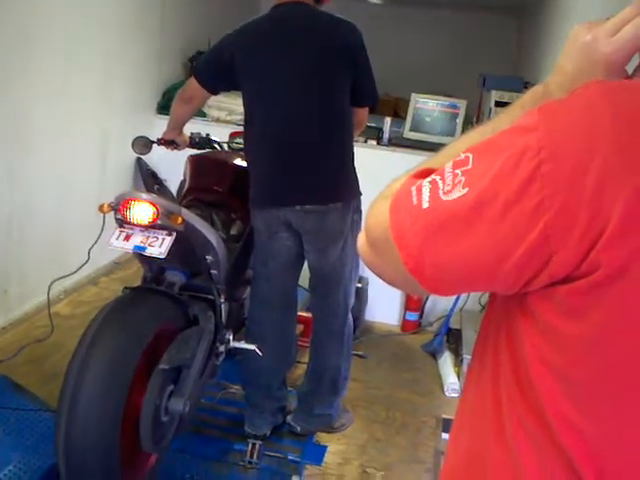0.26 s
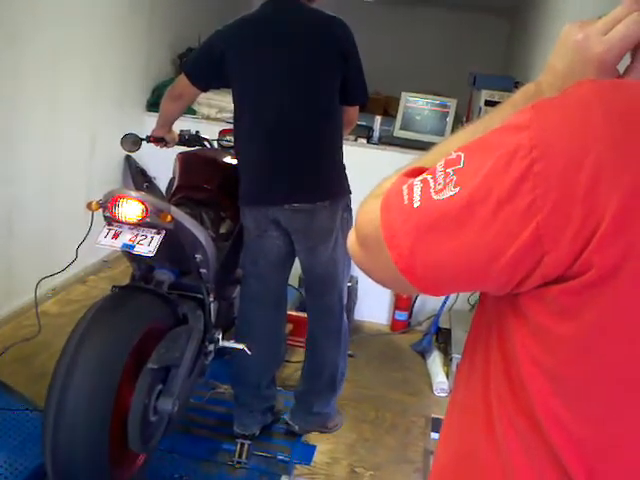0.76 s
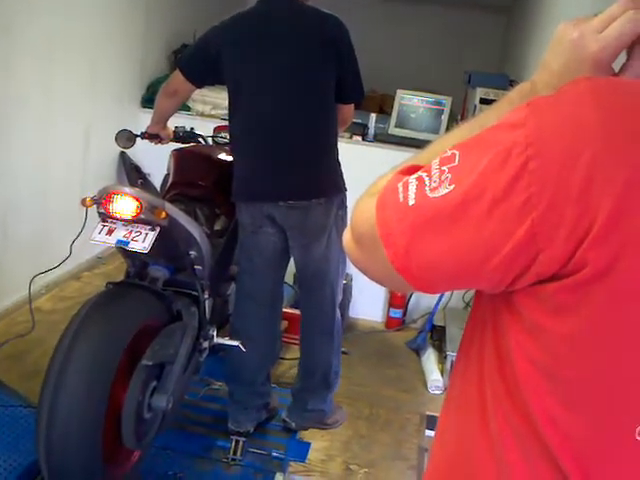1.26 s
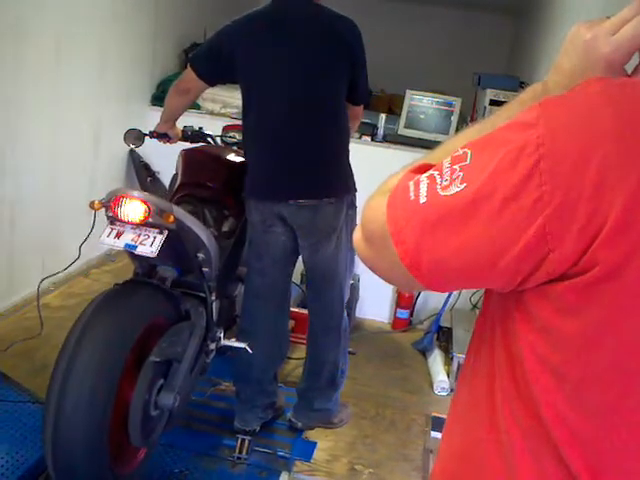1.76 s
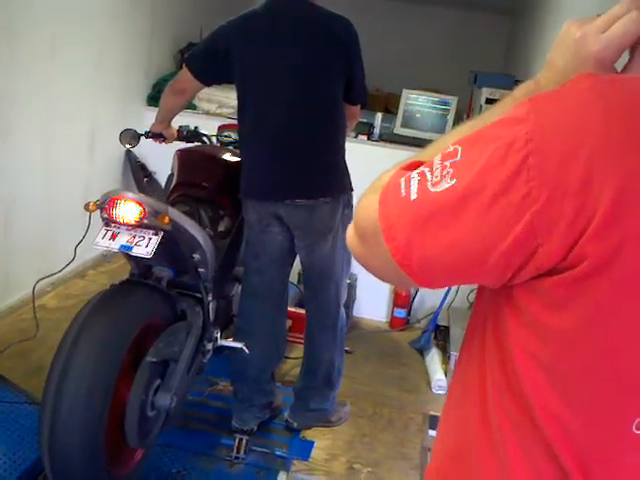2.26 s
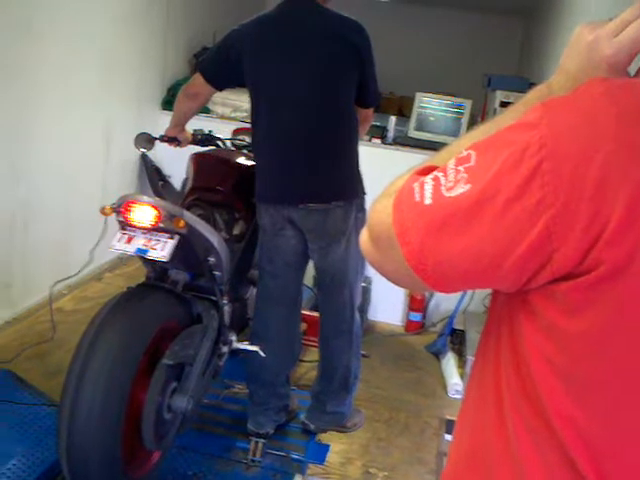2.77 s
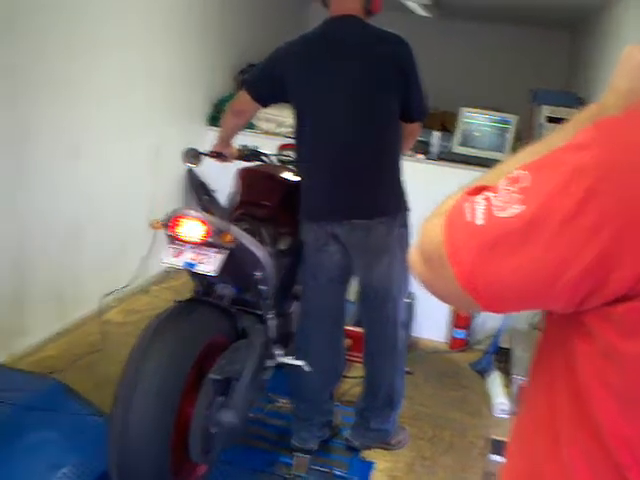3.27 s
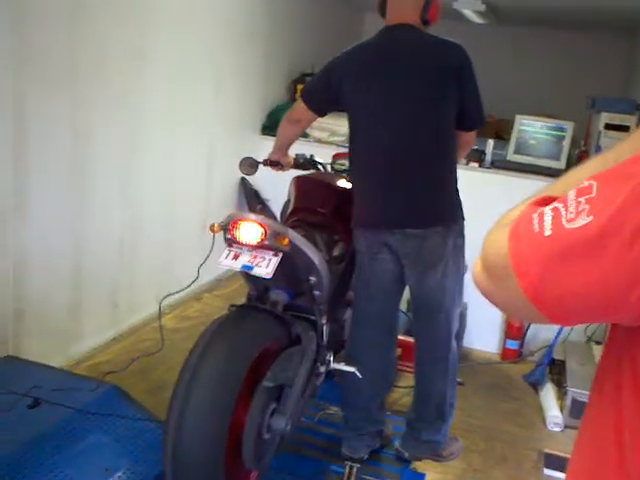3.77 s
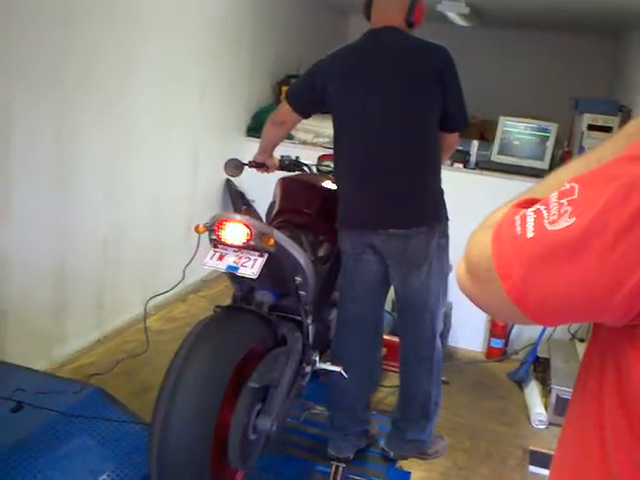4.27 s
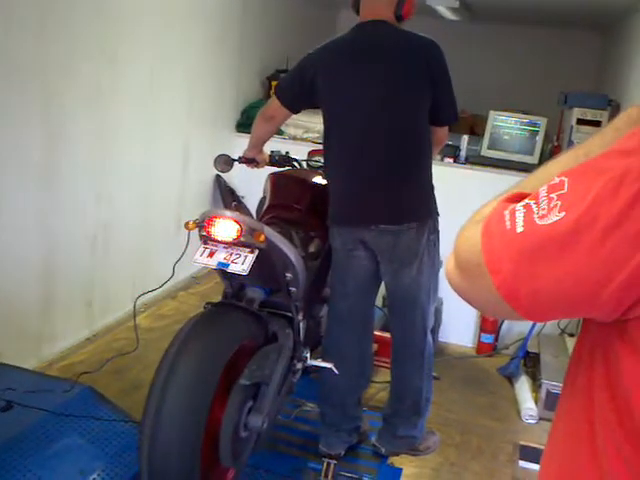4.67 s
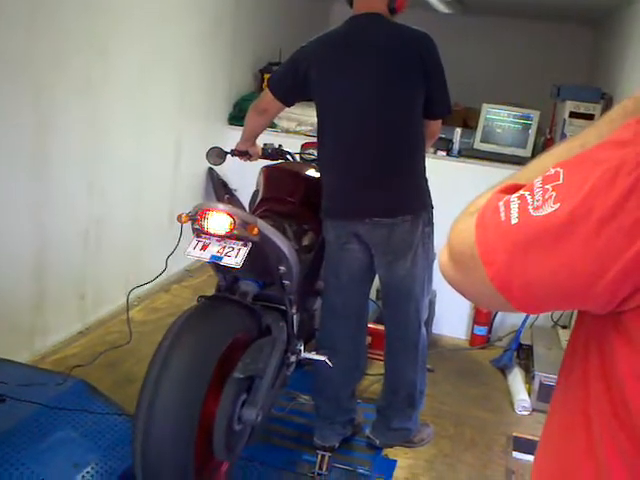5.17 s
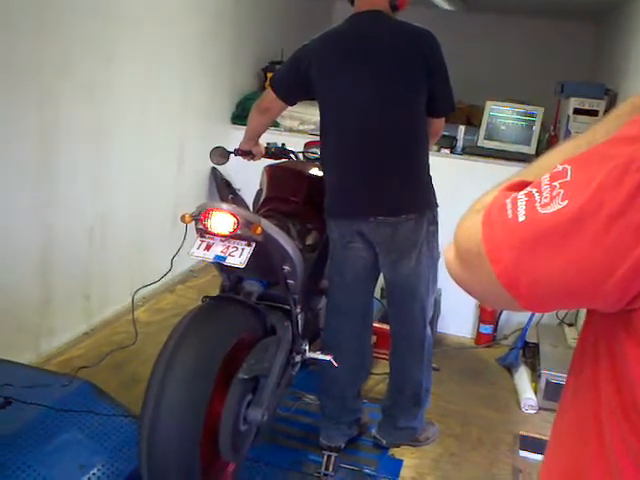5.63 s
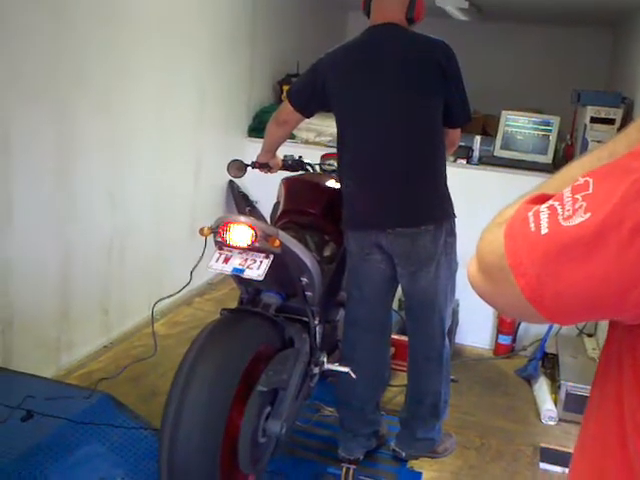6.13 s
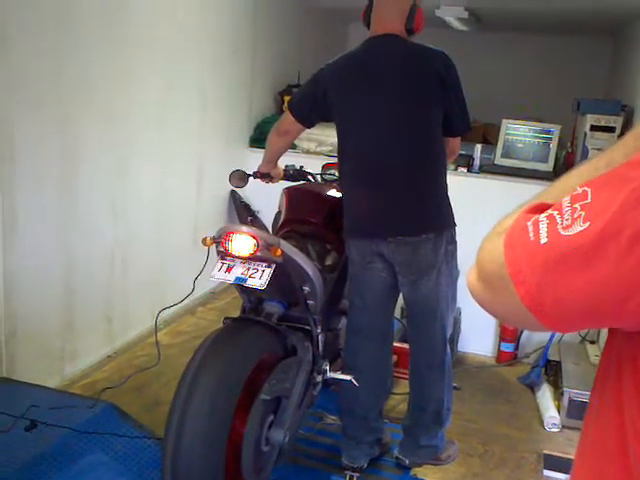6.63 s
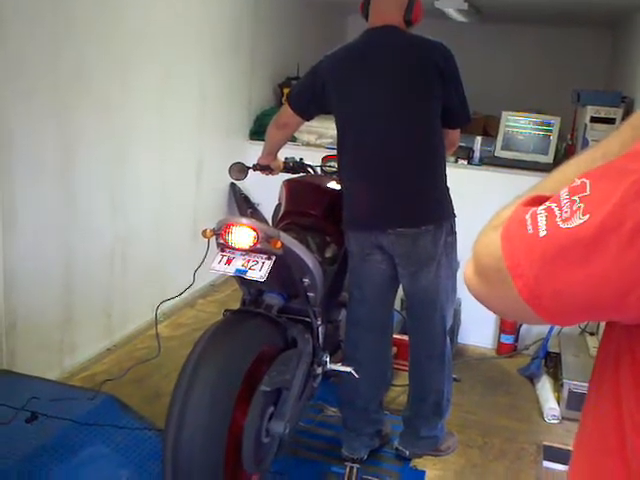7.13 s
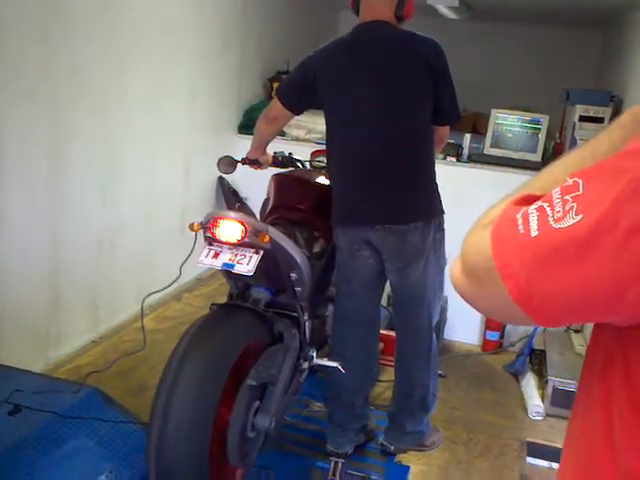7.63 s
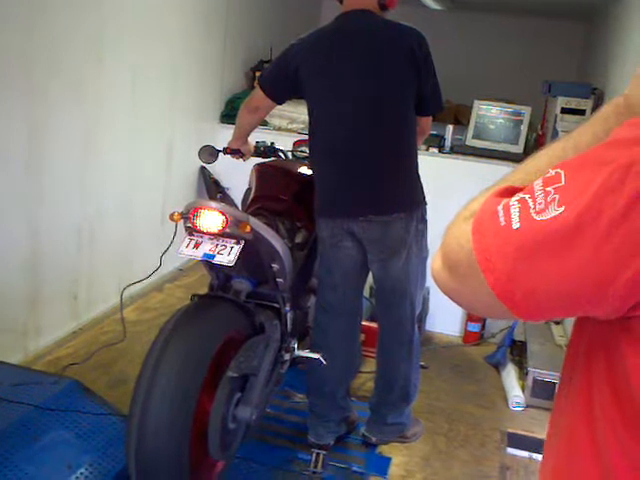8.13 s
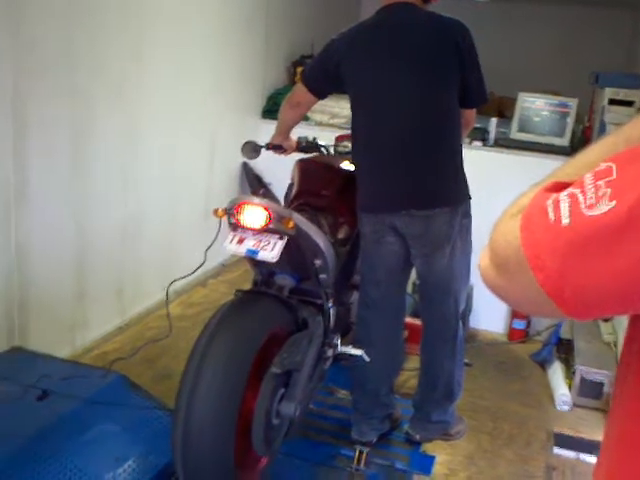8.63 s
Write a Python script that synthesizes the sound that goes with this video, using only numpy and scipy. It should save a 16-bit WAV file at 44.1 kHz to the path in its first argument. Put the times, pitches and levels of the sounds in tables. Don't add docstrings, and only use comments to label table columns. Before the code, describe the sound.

Loud, uneven V-twin exhaust drone drops abruptly to chain rush and falling gear whine, then coughs back on throttle and surges into a sustained, higher roar.

```python
import sys
import numpy as np
from scipy import signal
from scipy.fft import rfft, irfft, next_fast_len
from scipy.io import wavfile
from scipy.ndimage import uniform_filter1d

SR = 44100
rng = np.random.default_rng(int(sys.argv[2]) if len(sys.argv) > 2 else 0)


def transcribe(signal):
    frames = np.atleast_2d(signal).T
    limited = np.clip(frames, -1, 1)
    pcm = np.round(limited * 32767).astype(np.int16)
    wavfile.write(sys.argv[1], SR, pcm)


def decibels_to_gain(level_db):
    exponent = np.asarray(level_db, float) / 20
    return 10 ** exponent


N = 392490
SIZE = next_fast_len(N + SR // 2)
HZ = np.arange(SIZE // 2 + 1) * SR / SIZE

# t/s, f/Hz
CYCLE_SPEED = [(0, 24.01), (1.51, 23.98), (1.66, 21.36), (2.15, 19.19), (3.1, 17.39), (3.22, 18.61),
               (3.4, 19.01), (3.8, 21.09), (5.0, 29.29), (5.57, 34.19), (5.72, 34.87), (5.95, 34.79),
               (6.4, 33.26), (6.88, 32.48), (7.4, 33.0), (7.9, 33.4), (8.9, 33.51)]
# t/s, level/dB
FIRING_LEVEL = [(0, -15), (1.52, -15), (1.575, -17), (1.61, -36), (1.76, -41.5), (3.1, -36), (3.128, -39),
                (3.2, -31), (3.4, -19.5), (3.6, -19.5), (4.2, -15.5), (5.0, -13.5), (5.8, -13), (6.3, -13),
                (8.9, -13.5)]
# multiple of the cycle, level/dB
FIRED_PULSE = [(1, -30), (2, -65), (3, -16), (4, -10.5), (5, -0.5), (6, -5.5), (7, 4.5), (8, 13.5), (9, 3),
               (10, 4.5), (11, 1), (12, 1), (13, 1.5), (14, 3), (16, 1), (19, 1.5), (24, -7.5), (40, -6)]
# multiple of the cycle, level/dB
PUMPED_PULSE = [(1, -26), (3, -10), (4, 14.5), (5, 4.5), (6, 12), (8, -3), (9, 10), (11, 7.5), (13, -14),
                (16, -39.5), (20, -15), (40, -58)]
# f/Hz, width/Hz, level/dB
PIPE_AND_ROOM = [(66, 13.7, -0.5), (90, 17.5, 5.5), (115.7, 13.2, 2), (157.7, 26.5, 2), (205.6, 52, 2.5),
                 (228.3, 38.8, 6), (263.5, 34.8, 3.5), (298.9, 39.3, 3), (345.2, 15.4, 2), (383.8, 18.5, 2),
                 (438, 56, -9), (450.5, 30, -2.5), (544.5, 51, -14), (603, 36, -11), (682, 55, -10),
                 (674.5, 30, -11), (756, 88, -9.5), (832, 58, -5.5), (930, 107, -12.5), (1200, 254, -13)]
# f/Hz, level/dB re common part, phase turn/rad
PORT_DIFFERENCE = [(70, -66, 0.1), (98, -18, 0.1), (136, -20, 1.3), (167, -13, 0.1), (216, -4, 0.77),
                   (270, -14, 1.24), (296, -10, 2.3), (333, -8, 2.1), (386, -24, 1.1), (473, -0.5, 1.87),
                   (533, -1.5, 1.84), (650, 2, 2.17), (804, -2.5, 1.4), (1100, 6.5, 1.7)]
# f/Hz, level/dB
BARK_COLOUR = [(60, -28), (150, -7.5), (400, 4), (700, -3), (1400, -3), (2200, -6), (3000, -9),
               (4500, -18.5)]
# f/Hz, level/dB
HISS_COLOUR = [(1500, -40), (2800, 1), (3800, -1), (5200, 0.5), (7000, -5), (9000, 0), (11000, -1),
               (14000, -7)]
# f/Hz, level/dB
CHAIN_COLOUR = [(90, 0), (200, 8), (500, -3), (1000, -3.5), (2000, -11), (3500, -12.5), (5200, -28),
                (7500, -3), (10000, -17.5), (14000, -50)]
# multiple of the whine, level/dB
GEAR_PARTIALS = [(1, -1), (2, -8.5), (3, -7)]
# f/Hz, level/dB
GUST_COLOUR = [(15, -4), (40, -8), (80, 1), (140, 13), (250, -21), (500, -10.5)]

REAR_LAG = (360 - 43) / 720

BARK_DB, HISS_DB, GUST_DB = (3.5, -3, -2.5), (1, -14, -7.5), (-6, -11.5, -9)
CRACK_SHARE, REAR_DB = (0.15, 0.7, 0.33), (1.8, 1.5, 0.77)


def controls(t, hz):
    shut_db, open_db = -44, -16
    slow_hz, fast_hz = 25.4, 33.2
    catch_s, catch_lasts_s, catch_rear_db = 3.15, 0.3, 7.5
    fire_db = np.interp(t, *np.transpose(FIRING_LEVEL))
    load = np.clip((fire_db - shut_db) / (open_db - shut_db), 0, 1)
    revs = np.clip((hz - slow_hz) / (fast_hz - slow_hz), 0, 1)

    def rule(values):
        shut, open_slow, open_fast = values
        opened = open_slow + revs * (open_fast - open_slow)
        return shut + load * (opened - shut)

    catch = (t > catch_s) * np.exp(-((t - catch_s) / catch_lasts_s) ** 2)
    return fire_db, rule, rule(REAR_DB) + catch_rear_db * catch


def firings(turns):
    count = np.arange(1, int(turns[-1]) + 1)
    marks = np.column_stack([count, count + REAR_LAG]).ravel()
    marks = marks[marks < turns[-1]]
    return np.interp(marks, turns, np.arange(N)), np.arange(len(marks)) % 2


def stroke(orders, turns):
    k = np.arange(41)
    harmonics = decibels_to_gain(np.interp(k, *np.transpose(orders))) * (k > 0)
    cycle = unit(irfft(harmonics, 4096))
    return np.interp(turns, np.arange(4096) / 4096, cycle, period=1)


def boom(turns, at, rear, scatter_db, fire_db, rear_db):
    front_gain, rear_gain = (
        decibels_to_gain(np.interp(np.arange(N), at[rear == k], scatter_db[rear == k])) for k in (0, 1))
    rear_turns = turns - REAR_LAG
    fired = front_gain * stroke(FIRED_PULSE, turns)
    fired = fired + rear_gain * decibels_to_gain(rear_db) * stroke(FIRED_PULSE, rear_turns)
    pumped = front_gain * stroke(PUMPED_PULSE, turns)
    pumped = pumped + rear_gain * decibels_to_gain(-2) * stroke(PUMPED_PULSE, rear_turns)
    ring = -causal(resonances(PIPE_AND_ROOM)) * room(0.14, -1, 0)[0]
    ring_rms = np.sqrt(np.mean(shape(fired, ring) ** 2))
    pulses = (decibels_to_gain(fire_db) * fired + decibels_to_gain(-34) * pumped) / ring_rms
    hz, db, turn = np.transpose(PORT_DIFFERENCE)
    gradient = 1j * colour(np.transpose([hz, db])) * np.exp(1j * np.interp(HZ, hz, turn))
    both = shape(pulses, ring)
    apart = shape(pulses, ring * gradient)
    return np.array([both + apart, both - apart])


def gas(at, size, share, spectrum, decay_s, alike, walls):
    floor_s, floor_db = 0.0032, -5
    gate = signal.lfilter([1], [1, -np.exp(-1 / (decay_s * SR))], clicks(at, size))
    gate = gate + decibels_to_gain(floor_db) * np.roll(gate, int(floor_s * SR))
    crack = unit(shape(gate * (0.88 + rng.standard_normal(N)), walls))
    roar = unit(diffuse(alike, 1.1))
    jet = np.sqrt(share) * crack + np.sqrt(1 - share) * roar
    return unit(shape(jet, colour(spectrum)))


def buzz(low):
    crest = np.maximum(low, 0) ** 3.1
    return decibels_to_gain(-22.5) * shape(crest * rng.standard_normal((2, N)), colour(HISS_COLOUR))


def gear_whine():
    start_s, end_s, fade_s, level_db = 1.6, 3.2, 0.092, -47
    from_hz, to_hz, settle_s = 2530, 1994, 0.62
    t = np.arange(N) / SR
    whine_hz = to_hz + (from_hz - to_hz) * np.exp((start_s - t.clip(start_s)) / settle_s)
    turns = np.cumsum(whine_hz * (1 + 0.006 * walk(60))) / SR
    tone = sum(decibels_to_gain(part_db + 2.7 * walk(24.04)) * np.sin(2 * np.pi * k * turns)
               for k, part_db in GEAR_PARTIALS)
    fade = np.clip(np.minimum(t - start_s, end_s - t) / fade_s + 0.5, 0, 1)
    return tone * np.sqrt(2) * decibels_to_gain(level_db) * fade


def drive(hz, walls):
    rush = unit(shape(diffuse(0.42, 3.4), colour(CHAIN_COLOUR)))
    whine = shape(gear_whine(), walls / np.abs(walls))
    return decibels_to_gain(-34) * (hz / 20) ** 2.57 * rush + whine


def gusts(db):
    push = unit(shape(rng.standard_normal(N), colour(GUST_COLOUR))) * decibels_to_gain(db + 3 * walk(6))
    return np.array([push, -push])


def diffuse(alike, flicker_db):
    same, own = rng.standard_normal(N), rng.standard_normal((2, N))
    alike = np.clip(alike, 0, 1)
    return decibels_to_gain(flicker_db * walk(30)) * (np.sqrt(alike) * same + np.sqrt(1 - alike) * own)


def room(t60_s, wet_db, ripple):
    s = np.arange(SR // 2) / SR
    decay = np.exp(-np.log(1000) * s / t60_s) * (s > 0.002)
    tail = rng.standard_normal((2, len(s))) * decay
    tail *= decibels_to_gain(wet_db) / np.sqrt(np.sum(tail ** 2, axis=1, keepdims=True))
    tail[:, 0] = 1
    gain = rfft(tail, SIZE) / np.sqrt(1 + decibels_to_gain(2 * wet_db))
    return gain / np.abs(gain) ** (1 - ripple)


def resonances(modes):
    total = 0
    for k, (f, width, db) in enumerate(modes):
        damping = 1j * HZ * width
        total = total + (-1) ** k * decibels_to_gain(db) * damping / (f * f - HZ ** 2 + damping)
    return total


def causal(gain):
    cepstrum = irfft(np.log(np.abs(gain) + 1e-4), SIZE)
    cepstrum[1:SIZE // 2] *= 2
    return np.exp(rfft(cepstrum[:SIZE // 2], SIZE))


def shape(x, gain):
    return irfft(rfft(x, SIZE) * gain, SIZE)[..., :N]


def colour(points):
    hz, db = np.transpose(points)
    return decibels_to_gain(np.interp(np.log(HZ + 1), np.log(hz), db))


def unit(x):
    return x / np.sqrt(np.mean(x ** 2))


def walk(rate):
    k = int(SR / rate)
    held = np.repeat(rng.standard_normal(N // k + 1), k)
    return 0.87 * uniform_filter1d(uniform_filter1d(held, k), k)[:N]


def clicks(at, size):
    whole = np.clip(at.astype(int), 0, N - 2)
    part = at - whole
    return np.bincount(whole, size * (1 - part), N) + np.bincount(whole + 1, size * part, N)


def scene():
    t = np.arange(N) / SR
    hz = np.interp(t, *np.transpose(CYCLE_SPEED))
    fire_db, rule, rear_db = controls(t, hz)
    share = np.clip(rule(CRACK_SHARE), 0, 0.98)
    turns = 0.56 + np.cumsum(hz) / SR + 0.0015 * walk(30)
    at, rear = firings(turns)
    boom_chance, gas_chance, hiss_chance = rng.standard_normal((3, len(at)))
    size = decibels_to_gain(rear * rear_db[at.astype(int)]) * decibels_to_gain(1.4 * gas_chance)
    hiss_size = size * decibels_to_gain(4.2 * hiss_chance)
    walls = room(0.25, -4, 0.6)
    low = decibels_to_gain(5.5) * boom(turns, at, rear, 0.59 * boom_chance, fire_db, rear_db)
    bark = gas(at, size, share, BARK_COLOUR, 0.0022, 0.11, walls)
    bark = decibels_to_gain(fire_db + rule(BARK_DB)) * bark
    hiss = gas(at, hiss_size, 0.77 * share, HISS_COLOUR, 0.0026, 0.084, walls)
    hiss = decibels_to_gain(fire_db + rule(HISS_DB) - 0.6) * hiss
    return low + buzz(low) + bark + hiss + drive(hz, walls) + gusts(fire_db + rule(GUST_DB))


def top_cut(x):
    return signal.sosfilt(signal.butter(12, 14660, fs=SR, output="sos"), x)


def record(dry):
    port_lag, top_hz = 17, 14150
    ports = rfft(np.tanh(0.92 * dry) / 0.94, SIZE)
    delay = np.exp(-2j * np.pi * HZ * port_lag / SR)
    dulling = 0.3 + 0.695 / (1 + (HZ / 4900) ** 8)
    apart = ports - ports[::-1] * delay * dulling
    wide = irfft(apart * (HZ < top_hz), SIZE)[:, :N]
    return top_cut(wide)


dry = scene()
out = record(dry)
transcribe(out)
```